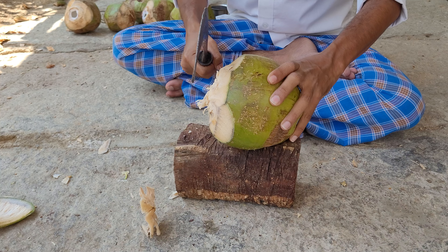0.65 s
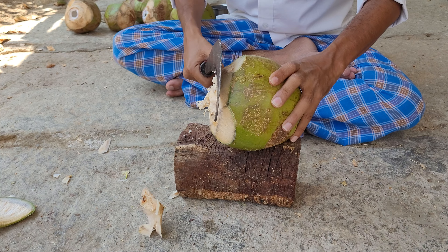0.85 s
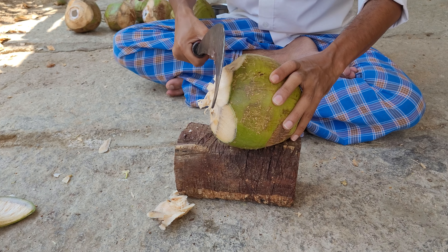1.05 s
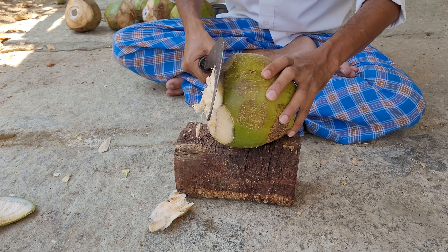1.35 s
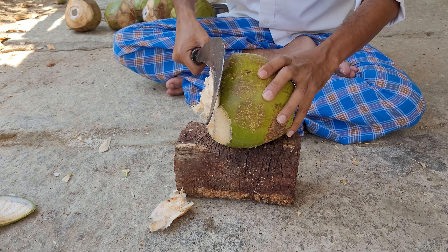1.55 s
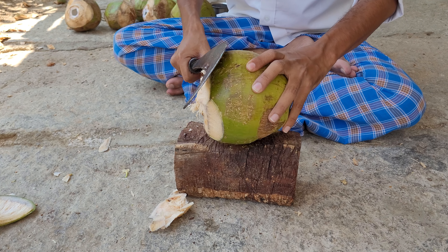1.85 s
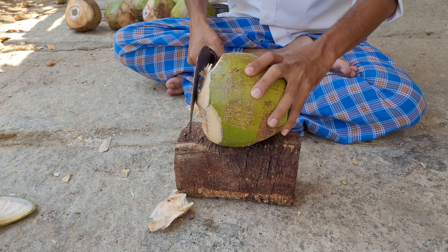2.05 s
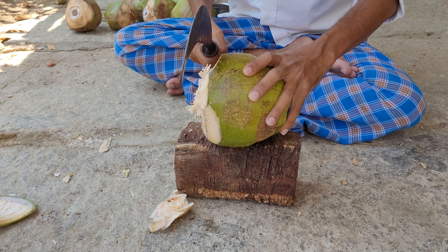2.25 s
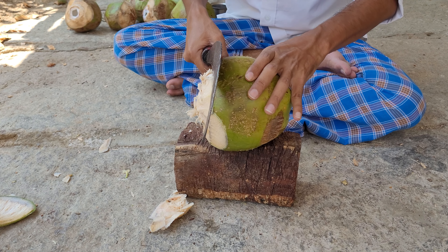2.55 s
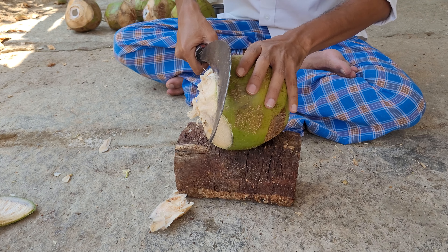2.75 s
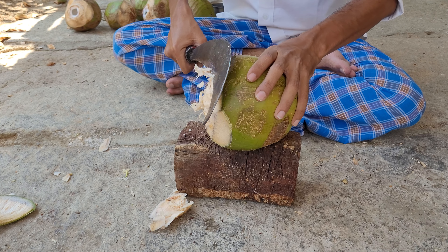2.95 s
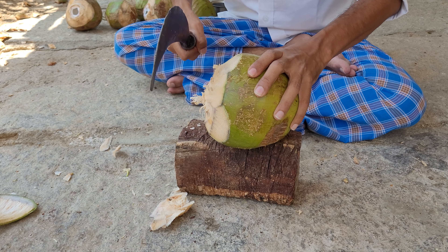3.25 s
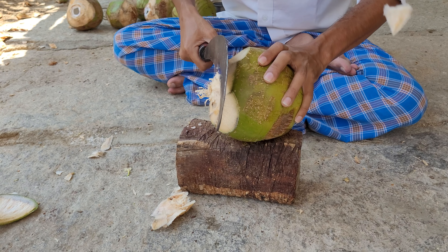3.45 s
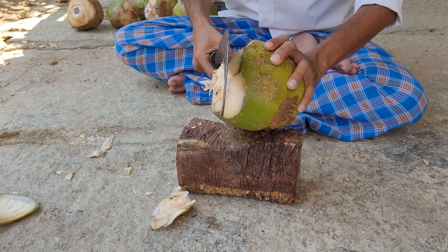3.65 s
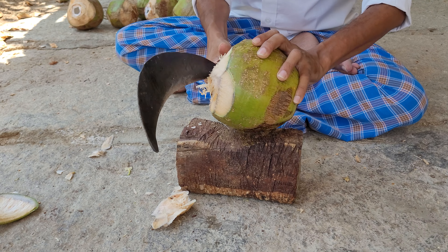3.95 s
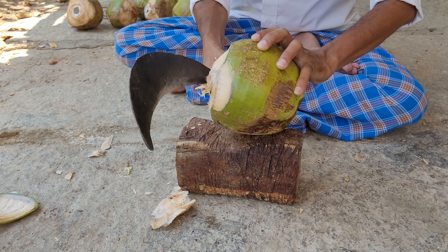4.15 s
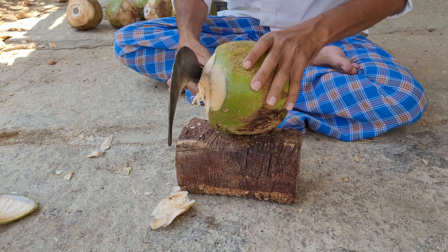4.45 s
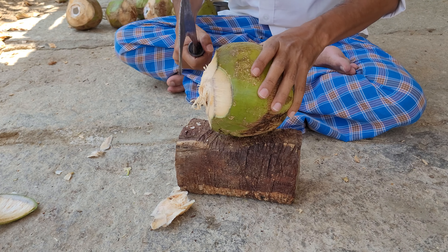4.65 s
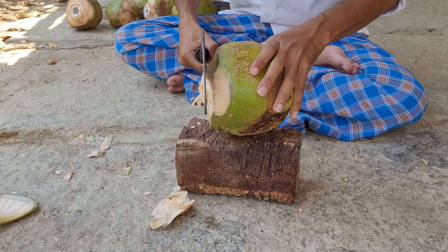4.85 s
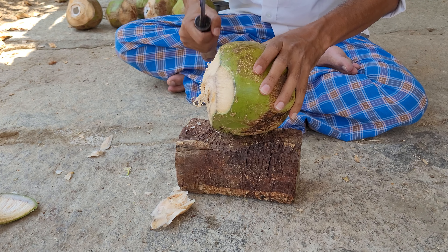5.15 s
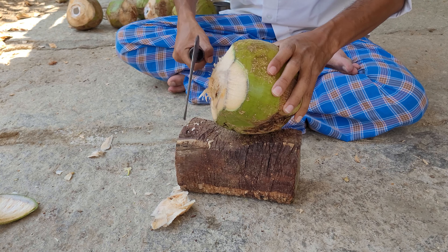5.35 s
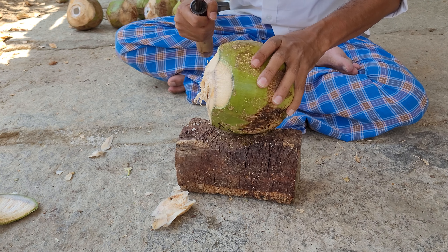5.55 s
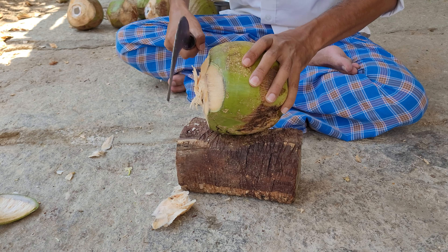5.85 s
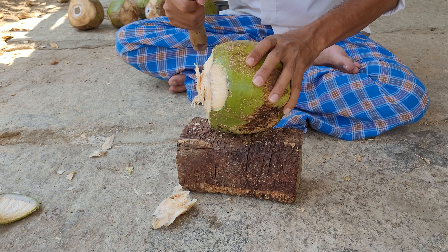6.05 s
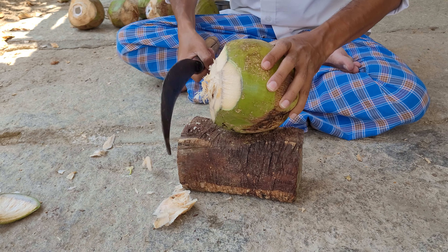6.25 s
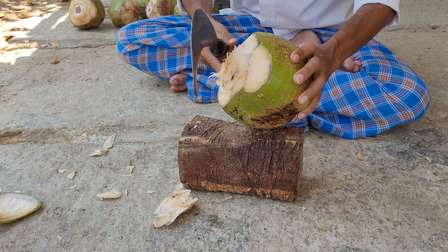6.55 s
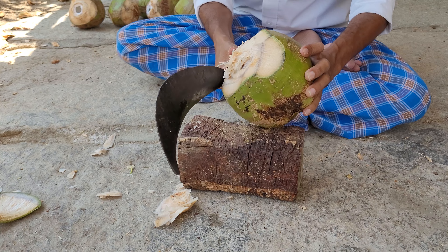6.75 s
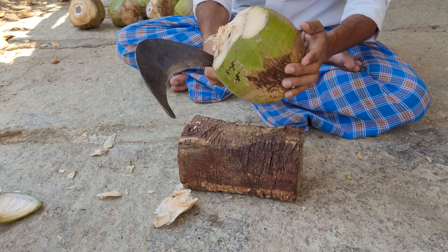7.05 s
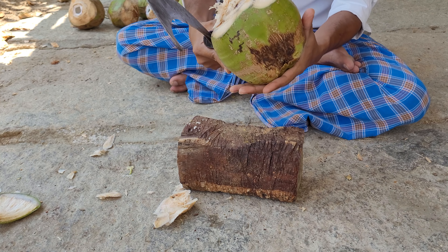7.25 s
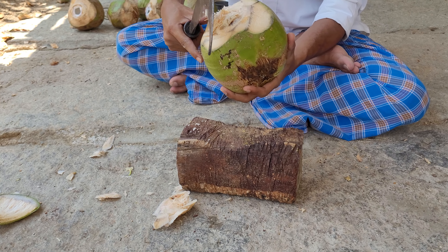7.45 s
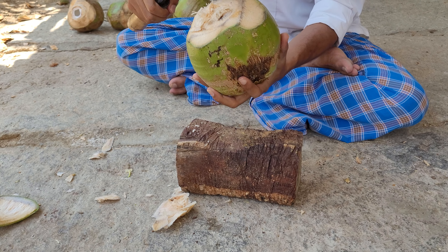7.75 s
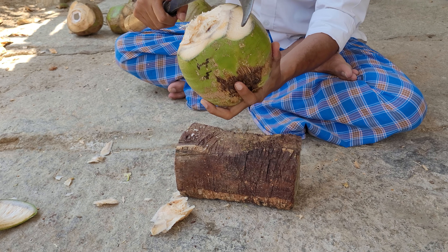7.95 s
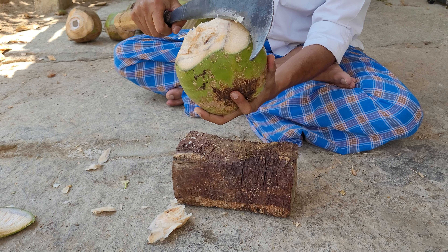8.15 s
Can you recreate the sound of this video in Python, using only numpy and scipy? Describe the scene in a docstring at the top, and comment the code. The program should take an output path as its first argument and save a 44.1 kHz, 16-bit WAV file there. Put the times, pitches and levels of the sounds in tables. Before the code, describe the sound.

Close, sharp chops cut through wet coconut husk, with uneven pauses between them. Two strikes come first, then a scrape of prying and a thudding knock into a log. After a dry tick, a harder blow lands with a brief ring of steel, followed by lighter cuts and crackling fibres. The thuds echo slightly in the yard, where distant birds chirp over soft outdoor air and a faint steady whine.

```python
"""A sickle trims a green coconut on a log in a stone yard: wet husk tears and squeaks, the nut thuds,
some blows reach the wood, and the freed blade rings. A wall returns the thuds.
Between blows the blade pries at the husk, fibres snap, hands turn the nut; one dry tick sounds.
Small birds chirp far off over a steady hush with a faint high whine."""
import sys
import numpy as np
from scipy import signal
from scipy.fft import rfft, irfft, next_fast_len
from scipy.io import wavfile
from scipy.ndimage import map_coordinates

SR = 44100
rng = np.random.default_rng(int(sys.argv[2]) if len(sys.argv) > 2 else 0)


def file_out(sig):
    """Save sig as 16-bit WAV at sys.argv[1]."""
    # one column per channel
    cols = np.atleast_2d(sig).T
    # limit, then scale
    lim = np.clip(cols, -1, 1)
    pcm = np.round(lim * 32767).astype(np.int16)
    wavfile.write(sys.argv[1], SR, pcm)


N = 366471
TIME_S = np.arange(N) / SR
AGE_S = np.arange(SR // 2) / SR  # since a blow

# blade into husk: t/s, crack/dB, bite/dB, squeak/dB, spray/dB, thump/dB, bounce/dB, husk/dB,
# cut length/s, squeak/Hz
CHOPS = [(0.229, -39, -19, -20, -21.5, -27.5, -24, -33, 0.0043, 4080),
         (0.799, -60.5, -56, -57.5, -59, -50, -47, -47, 0.0047, 5240),
         (1.335, -38, -29.5, -34.5, -32, -27.5, -20.5, -36.5, 0.0041, 3535),
         (3.0709, -37, -32.5, -30.5, -39, -40, -23, -25.5, 0.0015, 4410),
         (3.507, -57, -41.5, -47, -42, -57.5, -57, -53.5, 0.0062, 3920),
         (4.795, -60.5, -49.5, -54, -53, -64, -62, -59, 0.009, 3980),
         (5.234, -37.5, -33, -30, -32.5, -38, -50, -35.5, 0.0031, 4250),
         (5.264, -23.5, -28, -30.5, -30, -28, -19, -23, 0.0044, 3890),
         (5.703, -46.5, -31.5, -36, -29.5, -57.5, -52.5, -37, 0.004, 4420),
         (5.708, -48.5, -32, -39, -29, -41, -42, -58, 0.0061, 3940),
         (6.195, -46, -39.5, -40, -36, -45, -43, -37.5, 0.0066, 3940),
         (6.241, -41, -33.5, -27.5, -36.5, -35.5, -23.5, -29, 0.0018, 4255),
         (8.117, -49.5, -38.5, -42.5, -45, -59.5, -61, -52.5, 0.007, 4595)]
# blade into log: t/s, low note/dB, knock/dB, hardness (treble gain)/dB
KNOCKS = [(3.073, -22, -17.5, -25.5), (5.264, -33, -15.5, -10), (6.241, -33, -25.5, -17.5)]
# nut rocking: t/s, thump/dB, bounce/dB, husk/dB
BUMPS = [(0.828, -64, -56, -81), (1.047, -72.5, -63, -61.5), (2.432, -64, -49, -59),
         (2.979, -47, -49, -49.5), (3.542, -63.5, -63, -54), (4.242, -59, -44.5, -44),
         (5.788, -58, -45, -40.5), (6.962, -74.5, -55.5, -57), (7.076, -87, -53.5, -59),
         (8.087, -59, -61, -56)]
# blade springing free: t/s, level/dB, excitation centre/Hz
BLADE_RINGS = [(0.796, -65, 7100), (3.15, -49.5, 5400), (3.167, -50, 12000), (5.238, -42.5, 7100),
               (5.76, -53, 7100), (8.119, -55, 9140)]
# blade levering: t/s, length/s, level/dB
PRIES = [(2.062, 0.026, -55.5), (2.82, 0.14, -50.5), (2.972, 0.065, -48), (3.028, 0.034, -46),
         (3.145, 0.017, -49), (7.07, 0.06, -52)]
# fibres and chips: t/s, crack/dB, spray/dB
SNAPS = [(0.5334, -59.5, -63), (0.8318, -61, -73), (2.075, -65, -60), (2.0992, -63.5, -57),
         (2.8376, -55, -57), (3.019, -43.5, -44), (7.0844, -70, -41.5), (7.1058, -57, -34),
         (7.12, -62, -45), (7.136, -48, -48), (7.148, -51, -55), (7.162, -43, -62), (7.169, -51, -59),
         (8.1317, -52, -60)]
# palm slides: mid t/s, length/s, level/dB
SLIDES = [(1.758, 0.04, -71), (2.016, 0.18, -68.5), (2.451, 0.09, -65), (2.65, 0.11, -65),
          (3.697, 0.2, -69), (3.97, 0.11, -62.5), (4.284, 0.072, -59), (4.436, 0.12, -70),
          (6.844, 0.073, -62.5), (7.111, 0.017, -48.5), (7.27, 0.06, -66.5), (7.445, 0.15, -73.5),
          (7.68, 0.16, -68.5)]
# bird calls: t/s, lower note/Hz, level/dB
CHIRPS = [(-0.04, 3310, -54), (0.369, 2920, -56.5), (0.975, 3800, -51.5), (1.66, 4490, -49.5),
          (2.228, 3150, -55), (2.616, 3620, -52), (3.395, 3604, -49), (3.719, 3020, -53),
          (4.121, 4510, -50), (4.545, 3130, -55), (4.879, 4600, -58.5), (4.966, 3640, -57.5),
          (5.4, 3530, -54), (5.84, 5235, -58), (6.615, 4500, -49.5), (7.12, 3670, -55), (7.419, 3296, -54),
          (7.8, 2890, -57), (8.159, 3850, -48.5)]
# squeak partials: pitch ratio, level/dB
SQUEAK_PARTIALS = [(0.999, -1.5), (1.331, -6.5), (2.9, -11.5)]

# modes: f/Hz, level/dB, t60/s
BOUNCE_MODES = [(78.8, -8.5, 0.18), (135.6, -1, 0.13)]
HUSK_MODES = [(190, -1, 0.048), (250.7, 1, 0.11), (317.5, 2.5, 0.064), (383, -7, 0.14)]
LOG_MODES = [(398, -3.5, 0.33), (446, 3.5, 0.35), (540, 17, 0.29), (640, -11, 0.25), (714, -9, 0.17),
             (748, -5, 0.33), (790, -4, 0.12), (1023, 15.5, 0.23), (1050, 14, 0.51), (1050, -12, 0.093),
             (1200, 5, 0.093), (1400, 7, 0.54)]
LOG_LOW_MODE = [(402.5, 0, 0.12)]
BLADE_MODES = [(5000, 0, 0.1), (5310, 0, 0.25), (7100, -5, 0.18), (8700, 1, 0.13), (10500, 8, 0.13),
               (12900, 0, 0.1)]

# spectra: f/Hz, level/dB
SKIN_CRACK = [(150, -28), (400, -3.5), (700, -2.5), (1100, 2), (1500, -3), (2200, -9.5), (3500, -21),
              (6000, -39.5)]
WET_BITE = [(800, -31), (2000, -12), (3100, -5.5), (3700, -1.5), (4500, 0.5), (5500, -4.5), (7000, -11),
            (10000, -39.5)]
WET_SPRAY = [(3000, -49), (6000, -15.5), (7100, -7), (8800, -5), (11500, 7.5), (14000, 0.5), (16000, -5.5)]
HUSK_CRUSH = [(100, -26), (220, -2), (380, -1.5), (600, -20), (1500, -49)]
WOOD_CUT = [(120, -2), (250, -2.5), (450, -1), (720, 3.5), (1000, 2.5), (1400, -12), (2000, -51),
            (4000, -9)]
BLADE_SCRAPE = [(800, -18), (2500, -5.5), (4400, 0), (6500, -2), (9000, -6.5), (12000, 3.5), (16000, 0)]
FIBRE_SNAP = [(1200, -32), (2500, -14), (3400, 1.5), (4800, 3), (6000, -12), (9000, -43)]
PALM_RUB = [(2000, -2.5), (5000, -6.5), (8500, -15), (12000, 0), (16000, -17.5)]
WALL_ECHO = [(140, -16), (300, -21.5), (700, -32.5), (2000, -41), (6000, -71)]
HUSH_LOW = [(15, -39), (25, -16.5), (139, -6.5), (212, -11), (247, -3), (307, -8), (403, -4.5), (468, -3),
            (554, -10), (776, -10), (1400, -18.5), (1820, -44.5), (3080, -120)]
HUSH_HIGH = [(820, -37), (1400, -10), (1550, 1), (1720, -4), (2290, -4), (2620, -13), (3240, -13.5),
             (3550, -13.5), (4040, -10), (4670, -10.5), (6000, -24.5), (7800, -56), (13200, -120)]
HUSH_TOP = [(4000, -31), (6000, 1.5), (7000, -1.5), (8400, -8), (9700, 9), (11500, 0), (13500, -6.5),
            (16000, -12)]
WHINE = [(1300, -35), (1500, -8.5), (1575, 4), (1650, -14), (1850, -29)]

# yard decay: f/Hz, base t60/s
YARD_DECAY = [(100, 0.43), (400, 0.27), (1200, 0.29), (4000, 0.25), (8000, 0.25), (15000, 0.11)]
# stereo coherence: f/Hz, left-right correlation
YARD_COHERENCE = [(130, .96), (300, .75), (640, .5), (1400, .15), (3000, 0)]
HUSH_COHERENCE = [(60, 0.7), (150, 0.9), (380, 0.8), (950, 0.12), (2380, -0.67), (5980, 0.3), (15000, -0.1)]
# stereo balance: f/Hz, left minus right/dB
NEAR_BALANCE = [(400, -1.5), (1300, -2), (2400, -7), (4200, -17), (6000, -8), (8000, -1), (15000, -2.5)]
YARD_BALANCE = [(400, -1.5), (2400, -2.5), (4200, -8), (7500, -1.5), (15000, 0)]
HUSH_BALANCE = [(60, -1.5), (130, -2.5), (290, -1.5), (640, -4), (1410, 1.5), (3100, -10), (6820, -11),
                (15000, 5.5)]
# direct-path phase: f/Hz, left lead/rad
NEAR_PHASE = [(0, -1), (2330, 1), (6460, 3.5), (8350, 9), (9390, 14.5), (10300, 15), (11100, 14.5),
              (16400, 20)]

ENTRY_S = 0.0025  # edge sinking in


def chops():
    """The blade cracks the skin, bites through wet fibres and drives the nut onto the log."""
    out = np.zeros((2, N))
    for t_s, crack_db, bite_db, squeak_db, spray_db, *thud_db, cut_s, squeak_hz in CHOPS:
        crack = amp(crack_db) * tear(SKIN_CRACK, 1.7 * cut_s, ENTRY_S, rough_db=2)
        bite = amp(bite_db) * tear(WET_BITE, 2.1 * cut_s, ENTRY_S, rough_db=0.5)
        bite += amp(squeak_db) * squeak(squeak_hz, 0.98 * cut_s)
        spray = amp(spray_db) * tear(WET_SPRAY, 0.7 * cut_s, ENTRY_S, rough_db=4)
        add(out, t_s, near(bite, wet_db=-8) + near(crack + spray, wet_db=-4))
        add(out, t_s + 0.002, thud(*thud_db, rise_s=0.0055))
    return out


def tear(spectrum, decay_s, rise_s, rough_db):
    """Fibres of every size break together: a burst with no single pitch."""
    envelope = cut_envelope(rise_s, decay_s)
    burst = envelope * fibres(len(AGE_S), rough_db)
    for _ in range(3):
        whitened = irfft(np.exp(1j * np.angle(rfft(burst))), len(AGE_S))
        burst = whitened * envelope ** 0.25
    return unit_hit(colour(burst, spectrum))


def cut_envelope(rise_s, decay_s):
    """Swells as the edge enters, then dies away."""
    return np.minimum(AGE_S / rise_s, 1) ** 2 * np.exp(-np.maximum(AGE_S - rise_s, 0) / decay_s)


def fibres(n, rough_db):
    """Noise clumped into the tiny bursts of tearing fibres."""
    return unit_rms(rng.standard_normal(n) * amp(rough_db * wobble(1500, n)))


def squeak(pitch_hz, decay_s, waver_hz=190):
    """Wet husk sticks and slips on the steel at a wavering pitch."""
    partials = sum(amp(db) * tone(ratio * pitch_hz + waver_hz * wobble(900, len(AGE_S)))
                   for ratio, db in SQUEAK_PARTIALS)
    return unit_hit(cut_envelope(ENTRY_S, decay_s) * partials)


def thud(thump_db, bounce_db, husk_db, rise_s):
    """The nut bounces on the log until the hand stills it; its body sounds hollow."""
    onset = 1 - np.exp(-AGE_S / rise_s)
    held = onset * np.exp(-(AGE_S / 0.054) ** 3)
    bounce = sum(amp(db) * unit_hit(-held * ring([mode], scatter_db=0))
                 for mode, db in zip(BOUNCE_MODES, (thump_db, bounce_db)))
    crush = tear(HUSK_CRUSH, decay_s=0.017, rise_s=rise_s, rough_db=-2.5)
    body = unit_hit(onset * ring(HUSK_MODES, scatter_db=2))
    hollow = amp(husk_db) * unit_hit(body + amp(1.5) * crush)
    return near(bounce, wet_db=-13) + near(hollow, wet_db=-5)


def knocks():
    """The blade lands in the log; a harder landing brings out the upper modes."""
    out = np.zeros((2, N))
    for t_s, note_db, knock_db, hardness_db in KNOCKS:
        wood = tear(WOOD_CUT, decay_s=0.0048, rise_s=0.0034, rough_db=1)
        wood += amp(-10) * unit_hit(ring(LOG_MODES, scatter_db=4))
        knock = amp(knock_db) * colour(wood, [(40, -11), (130, 3.5), (750, 4), (1100, hardness_db)])
        add(out, t_s, near(knock, wet_db=-10))
        low_note = amp(note_db) * unit_hit(ring(LOG_LOW_MODE, scatter_db=0))
        add(out, t_s, near(low_note, wet_db=-11.5))
    return out


def bumps():
    """The nut rocks softly as it is shifted."""
    out = np.zeros((2, N))
    for t_s, *thud_db in BUMPS:
        add(out, t_s, thud(*thud_db, rise_s=0.0061))
    return out


def blade_rings(focus_db_per_octave=40):
    """The freed blade rings briefly; the contact decides which modes sound most."""
    out = np.zeros(N)
    for t_s, level_db, centre_hz in BLADE_RINGS:
        modes = [(hz, db - focus_db_per_octave * abs(np.log2(hz / centre_hz)), t60_s)
                 for hz, db, t60_s in BLADE_MODES]
        steel = ring(modes, scatter_db=3.5)
        flicker = amp(2.3 * wobble(130, len(AGE_S)))
        add(out, t_s, amp(level_db) * unit_hit(steel * flicker))
    return near(out, wet_db=-9.5)


def prying(attack_s=0.017, release_s=0.0064, crackles_per_s=160):
    """Each push of the blade takes hold, tears and lets go; fibres crackle as they part."""
    pressure = np.zeros(N)
    for t_s, length_s, db in PRIES:
        attack = np.clip((TIME_S - t_s) / attack_s, 0, 1)
        release = np.exp(-np.maximum(TIME_S - t_s - length_s, 0) / release_s)
        pressure += amp(db) * attack * release
    breaks = (rng.random(N) < crackles_per_s / SR) * rng.standard_normal(N)
    crackle = amp(-6.5) * pressure * unit_rms(colour(breaks, FIBRE_SNAP))
    return rubbing(pressure, BLADE_SCRAPE, rough_db=7) + near(crackle, wet_db=-2)


def snaps():
    """Single fibres break and chips land."""
    out = np.zeros((2, N))
    for t_s, crack_db, spray_db in SNAPS:
        crack = amp(crack_db) * tear(FIBRE_SNAP, decay_s=0.0031, rise_s=0.00087, rough_db=-2)
        spray = amp(spray_db) * tear(WET_SPRAY, decay_s=0.0005, rise_s=0.0006, rough_db=3)
        add(out, t_s, near(crack + spray, wet_db=-10))
    return out


def hands():
    """A palm slides as the nut is turned, swelling and fading evenly."""
    pressure = sum(amp(db) / (1 + (2 * (TIME_S - mid_s) / length_s) ** 2)
                   for mid_s, length_s, db in SLIDES)
    return rubbing(pressure, PALM_RUB, rough_db=8)


def rubbing(pressure, spectrum, rough_db):
    """Friction on the husk: grainy noise that follows the pressure and keeps catching."""
    catching = amp(3 * wobble(120, N))
    friction = unit_rms(colour(catching * fibres(N, rough_db), spectrum))
    return near(pressure * friction, wet_db=1.5)


def tick(t_s=3.8374):
    """One dry tick on the right: a spike and its slower rebound."""
    out = np.zeros((2, N))
    spike = np.exp(-AGE_S / 0.000094)
    spectrum = [(80, -28), (300, 6), (600, 0), (4000, -3), (9000, -9.5), (16000, -14)]
    add(out[1], t_s, amp(-9) * colour(spike, spectrum))
    return out


def birds(length_s=0.105, fall_hz=950, warble_hz=305):
    """Far, warbled chirps step down to a lower note; they arrive as reverberation."""
    song = np.zeros(N)
    progress = np.linspace(0, 1, int(length_s * SR))
    swell = np.sqrt(np.abs(np.sin(np.pi * progress ** 1.42)))
    step_down = 1 / (1 + np.exp((progress - 0.45) / 0.081))
    for t_s, note_hz, db in CHIRPS:
        pitch_hz = note_hz + fall_hz * step_down + warble_hz * wobble(130, len(progress))
        add(song, t_s, amp(db) * swell * tone(pitch_hz))
    return yard(song, t60_scale=2.2)


def hush():
    """Steady outdoor air with a narrow whine that wavers in level."""
    def air(spectrum, level_db, sway_db):
        noise = filtered(diffuse(N, HUSH_COHERENCE), lambda hz: amp(along(spectrum, hz)))
        noise = pan(noise, HUSH_BALANCE)
        return noise / np.std(noise.mean(0)) * amp(level_db + sway_db * wobble(5.4, N))
    return (air(HUSH_LOW, -63.5, sway_db=1) + air(HUSH_HIGH, -65, sway_db=0.9)
            + air(HUSH_TOP, -81, sway_db=1.4) + air(WHINE, -76, sway_db=5.5))


def near(x, wet_db, paving_s=0.0021, paving_db=-10.5, corner_hz=604):
    """Paths from the log: direct, a treble reflection off the paving, and the yard."""
    def paths(hz):
        phase = np.exp(0.5j * along(NEAR_PHASE, hz) * np.array([[1], [-1]]))
        paving = amp(paving_db) * np.exp(-2j * np.pi * hz * paving_s) * hz / (hz + corner_hz)
        return phase * (1 + paving)
    return pan(filtered(x, paths), NEAR_BALANCE) + amp(wet_db) * yard(x)


def wall(x, delay_s=0.11, repeat_db=-18):
    """A far wall returns the lows of each blow, then once more faintly."""
    out = np.zeros((2, N))
    echo = filtered(x, lambda hz: amp(along(WALL_ECHO, hz)))
    add(out, delay_s, echo)
    add(out, 2 * delay_s, amp(repeat_db) * echo)
    return out


def yard(x, t60_scale=0.93, build_s=0.002):
    """Diffuse reverberation: a fresh noise tail, decaying band by band."""
    hz, t_s, bands = signal.stft(diffuse(len(AGE_S), YARD_COHERENCE), SR, nperseg=256)
    t60_s = t60_scale * along(YARD_DECAY, hz)[:, None]
    _, tail = signal.istft(bands * amp(-60 * t_s / t60_s), SR, nperseg=256)
    tail = tail[:, :len(AGE_S)] * (1 - np.exp(-(AGE_S / build_s) ** 2))
    tail /= np.linalg.norm(tail[0])
    return pan(signal.fftconvolve(x[None], tail, axes=1)[:, :len(x)], YARD_BALANCE)


def diffuse(n, coherence):
    """Stereo white noise with a given left-right correlation."""
    def weights(hz):
        angle_rad = np.arccos(along(coherence, hz)) / 2
        return np.array([np.cos(angle_rad), np.sin(angle_rad)])
    mid, side = filtered(rng.standard_normal((2, n)), weights)
    return np.array([mid + side, mid - side])


def pan(x, balance):
    """Left-right split, band by band."""
    def gains(hz):
        left = amp(along(balance, hz))
        return 2 * np.array([left, np.ones_like(left)]) / (1 + left)
    return filtered(x, gains)


def ring(modes, scatter_db):
    """Damped modes with random level scatter."""
    return sum(amp(db + scatter_db * rng.normal() - 60 * AGE_S / t60_s) * np.sin(2 * np.pi * hz * AGE_S)
               for hz, db, t60_s in modes)


def tone(pitch_hz):
    """Sine following a pitch curve."""
    return np.sin(2 * np.pi * np.cumsum(pitch_hz) / SR)


def wobble(knots_per_s, n):
    """Random curve, linear between knots."""
    knots = rng.standard_normal(int(n * knots_per_s / SR) + 4)
    return map_coordinates(knots, [np.arange(n) * knots_per_s / SR], order=1)


def colour(x, spectrum, size=4096):
    """Minimum-phase filter through (f/Hz, level/dB) points."""
    gain = amp(along(spectrum, np.fft.rfftfreq(size, 1 / SR)))
    cepstrum = irfft(np.log(gain))
    cepstrum[1:size // 2] *= 2
    cepstrum[size // 2 + 1:] = 0
    impulse = irfft(np.exp(rfft(cepstrum)))
    return signal.fftconvolve(x, impulse)[:len(x)]


def filtered(x, response):
    """Apply response(hz) by FFT."""
    n = x.shape[-1]
    size = next_fast_len(n + 8192)
    return irfft(rfft(x, size) * response(np.fft.rfftfreq(size, 1 / SR)), size)[..., :n]


def along(points, hz):
    """Interpolate (f/Hz, value) points on a log axis."""
    knots_hz, values = np.transpose(points)
    return np.interp(np.log(hz + 1), np.log(knots_hz + 1), values)


def add(track, t_s, x):
    """Mix x into track at t_s."""
    start = round(t_s * SR)
    x = x[..., max(-start, 0):max(N - start, 0)]
    track[..., max(start, 0):max(start, 0) + x.shape[-1]] += x


def amp(db):
    """dB to gain."""
    return 10 ** (np.asarray(db) / 20)


def unit_rms(x):
    """Scale to rms 1."""
    return x / np.sqrt(np.mean(x ** 2) + 1e-20)


def unit_hit(x):
    """Scale to the energy of 20 ms at rms 1."""
    return x / np.sqrt(np.sum(x ** 2) / (SR / 50) + 1e-20)


def scene():
    """Blows and their echo, handling, birds and air."""
    blows = chops() + knocks() + bumps()
    return blows + wall(blows) + blade_rings() + snaps() + prying() + hands() + tick() + birds() + hush()


def record(dry, low_hz=38, top_hz=16050):
    """High-pass, clip at full scale, steep low-pass."""
    thinned = signal.sosfilt(signal.butter(2, low_hz, "highpass", fs=SR, output="sos"), dry)
    return filtered(np.clip(thinned, -1, 1), lambda hz: 1 / np.sqrt(1 + (hz / top_hz) ** 240))


dry = scene()
out = record(dry)
file_out(out)
```